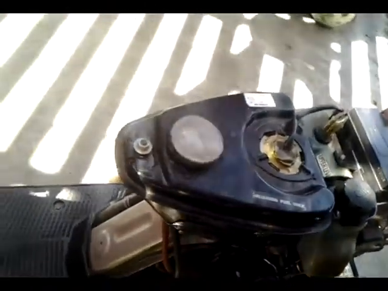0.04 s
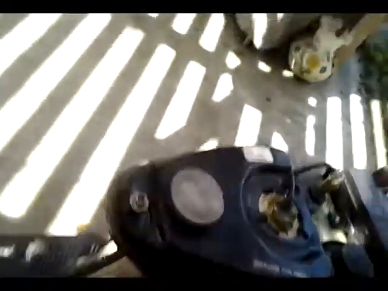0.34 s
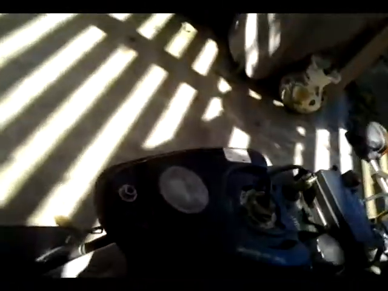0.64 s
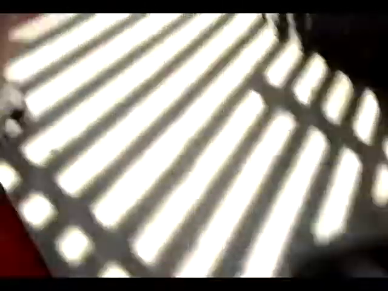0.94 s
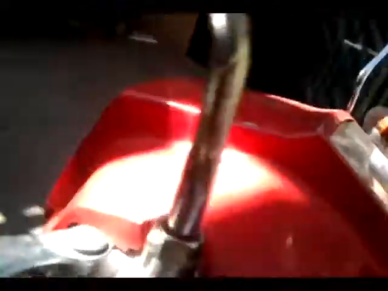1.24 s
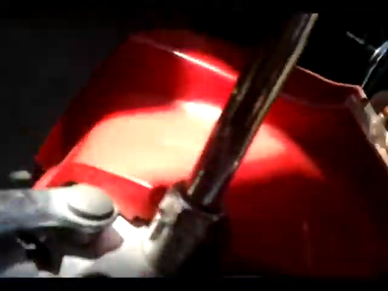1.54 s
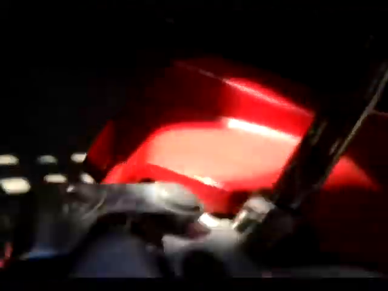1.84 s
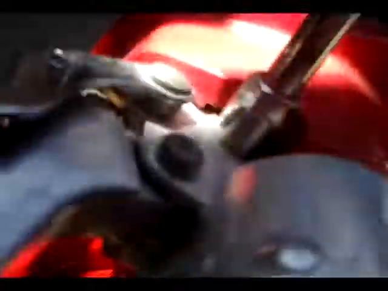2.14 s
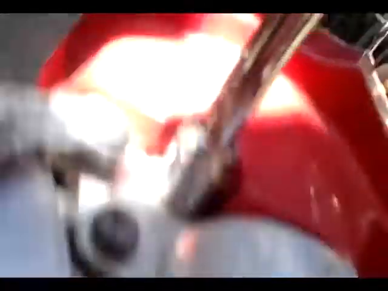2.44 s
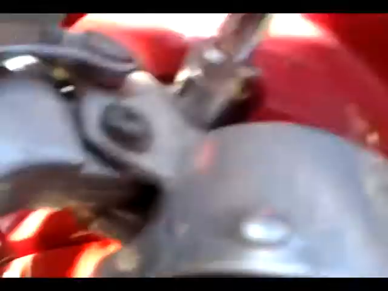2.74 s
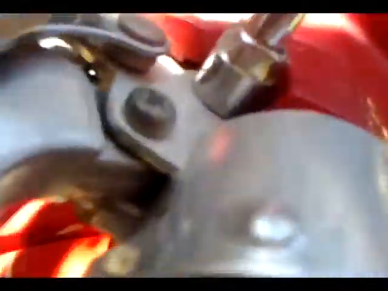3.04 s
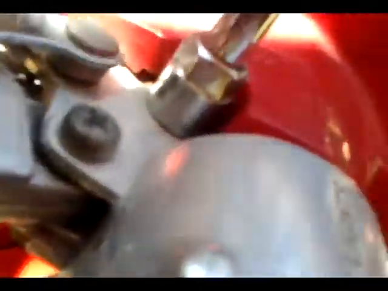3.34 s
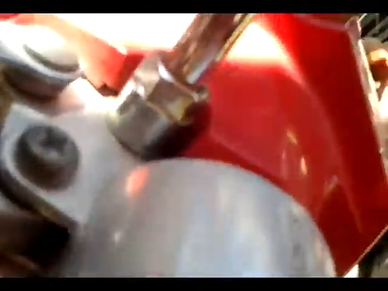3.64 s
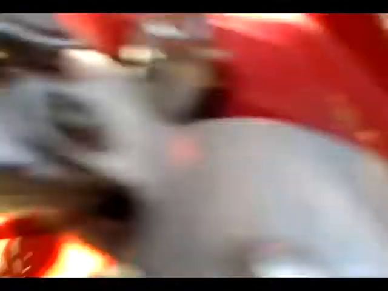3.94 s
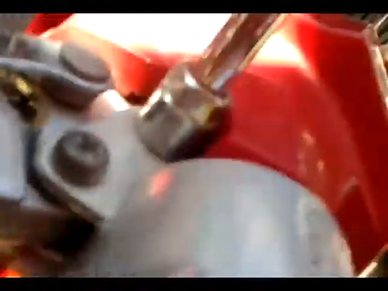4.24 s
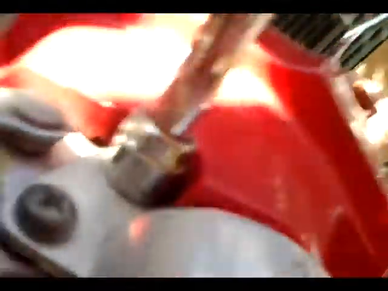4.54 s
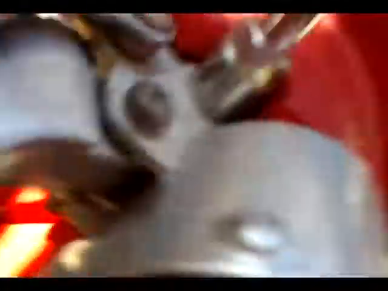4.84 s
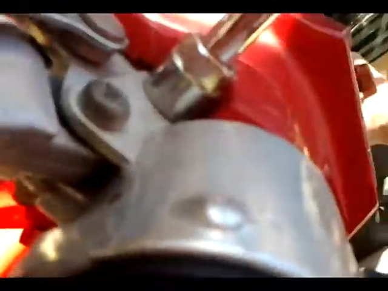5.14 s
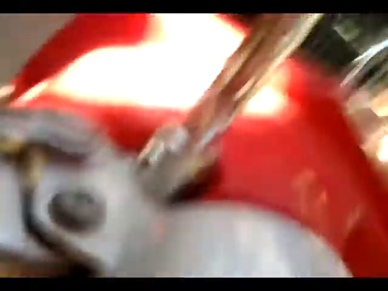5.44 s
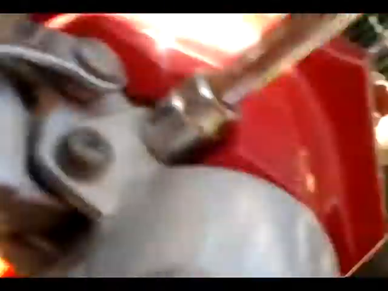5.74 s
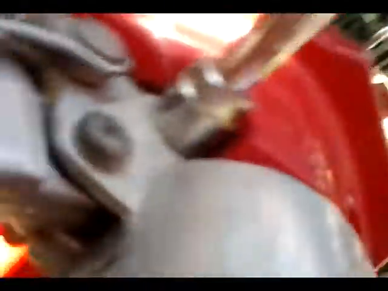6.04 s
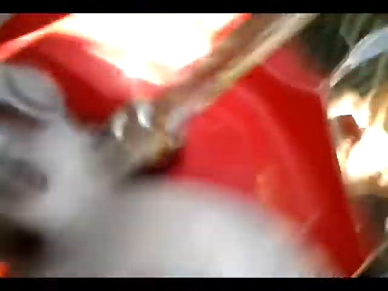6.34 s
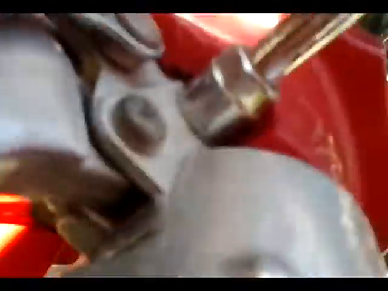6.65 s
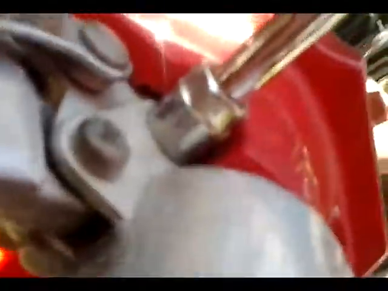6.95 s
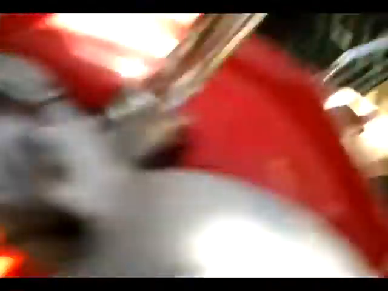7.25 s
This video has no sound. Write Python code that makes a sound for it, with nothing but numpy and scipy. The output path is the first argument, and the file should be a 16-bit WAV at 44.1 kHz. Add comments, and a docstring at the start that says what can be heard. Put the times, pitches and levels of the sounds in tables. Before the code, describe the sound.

A small two-stroke scooter is kicked over close to the microphone in a sheltered yard and never fires. After a soft scrape of the lever, two quick kicks come at about 0.4 and 0.7 seconds. Each kick is a sharp steel clack, a whirr of gears and ratchet, and a run of hollow piston chuffs that slows and fades amid knocks and rattling panels. After a short lull, more kicks follow at about 1.9, 2.7, 3.9, 4.7, 5.6 and 6.3 seconds, with a last one beginning at 7.2. The lever bites hardest at 2.7, and the cranking is strongest around 4 seconds. Between kicks, steel parts click and twang, most clearly near 3.6 seconds. The yard adds a brief echo. A soft outdoor hush lies underneath, with faint, distant bird chirps at the start and near 3.1 and 5.5 seconds.

```python
"""In a small sheltered yard, a two-stroke scooter is kicked over again and again and never fires.
With each kick, close to the microphone, the lever clacks into its gear, gears and ratchet whirr,
the piston chuffs and steel parts knock. Loose panels rattle as the engine coasts to rest.
The yard rings briefly, and a bird chirps far off over a soft outdoor hush."""
import sys
import numpy as np
from scipy import signal
from scipy.fft import rfft, irfft
from scipy.io import wavfile

SR = 44100
rng = np.random.default_rng(int(sys.argv[2]) if len(sys.argv) > 2 else 0)


def waveform_to_disk(signal):
    """Save audio, clipped to [-1, 1], as 16-bit WAV at the path in sys.argv[1]."""
    frames = np.transpose(np.atleast_2d(signal))
    scaled = np.clip(frames, -1, 1) * 32767
    samples = np.round(scaled).astype(np.int16)
    wavfile.write(sys.argv[1], SR, samples)


N = 322371
TIME = np.arange(N) / SR


def gain(db):
    """Turn decibels into a number to multiply by."""
    return 10 ** (np.asarray(db) / 20)


def unit(x):
    """Scale a signal to an average strength (rms) of 1."""
    return x / np.sqrt(np.mean(x ** 2))


def fade(t, t60):
    """Die away by 60 dB in t60 seconds, the ring time."""
    return np.exp(-np.log(1000) * t / max(t60, 1e-3))


def add(out, start_s, sound):
    """Mix a sound in at its start time."""
    i = max(int(start_s * SR), 0)
    out[i:i + len(sound)] += sound[:max(N - i, 0)]


def tap_response(tone, size=2048):
    """How a part with this table of frequencies and levels answers one sharp tap."""
    hz, db = np.transpose(tone)
    log_hz = np.log(np.fft.rfftfreq(size, 1 / SR) + 1)
    log_gain = np.log(gain(np.interp(log_hz, np.log(hz), db)))
    # fold the second half onto the first, so that nothing sounds before the tap
    folded = irfft(log_gain)
    folded[1:size // 2] *= 2
    folded[size // 2 + 1:] = 0
    return irfft(np.exp(rfft(folded)))


def colour(x, tone):
    """Give a signal the tone in a table, at strength 1."""
    return unit(signal.fftconvolve(x, tap_response(tone))[:len(x)])


def burst(response, shape):
    """A rough push of noise rings a part; the sound has the same energy as the push's shape."""
    push = rng.standard_normal(len(shape)) * shape
    sound = signal.fftconvolve(push, response)[:len(shape)]
    return sound * np.linalg.norm(shape) / np.linalg.norm(sound)


def notes(t, hz, spread, count, attack_s=0.00026):
    """A struck part sounds several notes at once, scattered around one pitch."""
    detune, weights = rng.standard_normal((count, 2)).T
    waves = np.sin(2 * np.pi * np.outer(t, hz * np.exp(spread * detune)))
    return waves @ unit(weights) * np.sqrt(2 / count) * (1 - np.exp(-t / attack_s))


# the tone of the open air: (frequency [Hz], relative level [dB])
HUSH_TONE = [(30, -25.5), (100, -3.5), (280, 4), (420, 1.5), (800, 0), (1500, -7.5), (2500, -9),
             (4500, -8.5), (6500, -12.5), (8000, -24), (10000, -35.5)]
def hush(db=-52):
    """A soft, steady outdoor noise."""
    return gain(db) * colour(rng.standard_normal(N), HUSH_TONE)


# a far-off bird: (time [s], length [s], first pitch [Hz], last pitch [Hz], level [dB])
BIRD_CHIRPS = [(.135, 0.012, 5900, 6200, -58), (0.17, .05, 5500, 5950, -60), (0.24, .022, 5950, 5600, -65),
               (.275, .028, 5950, 5600, -64), (3.112, 0.06, 5270, 4960, -53),
               (3.155, 0.047, 5900, 5750, -61), (5.446, 0.046, 5160, 5860, -50.5),
               (5.497, 0.054, 5320, 4800, -49), (6.143, 0.035, 6050, 5880, -63)]
def bird():
    """Each thin chirp swells and fades while its pitch slides."""
    out = np.zeros(N)
    for start, length, first_hz, last_hz, db in BIRD_CHIRPS:
        progress = np.linspace(0, 1, int(length * SR))
        hz = first_hz + (last_hz - first_hz) * progress
        whistle = np.sin(2 * np.pi * np.cumsum(hz) / SR)
        add(out, start, gain(db) * np.sin(np.pi * progress) * whistle)
    return out


def yard(x, low_t60=0.66, high_t60=0.19, split_hz=1800, low_db=-7, high_db=-12.5, build_s=0.0065):
    """Floor, walls and slatted roof send back a short wash of echoes; the low ones last longer."""
    t = np.arange(SR) / SR
    echoes = rng.standard_normal(len(t)) * (1 - np.exp(-t / build_s)) ** 2
    response = 0
    for kind, t60, db in (("low", low_t60, low_db), ("high", high_t60, high_db)):
        tail = echoes * fade(t, t60)
        band = signal.butter(1, split_hz, kind, fs=SR, output="sos")
        response = response + gain(db) * signal.sosfilt(band, tail / np.linalg.norm(tail))
    return signal.fftconvolve(x, response)[:N]


# the bright tone of the steel parts, with its top treble shaped by the recorder:
# (frequency [Hz], relative level [dB])
STEEL_TONE = [(1200, -59), (2200, -3), (2700, -1), (3400, -0.5), (3750, -3), (4450, 1), (5250, -1.5),
              (5950, -8), (6700, -10.5), (7400, -22), (8100, -33.5), (9500, -23.5), (11000, -46)]
def scrape(start_s=0.18, end_s=0.48, db=-54, edge_s=0.02):
    """The lever slides softly through its slack as the first kick begins."""
    sliding = np.clip(np.minimum(TIME - start_s, end_s - TIME) / edge_s, 0, 1)
    return gain(db) * sliding * colour(rng.standard_normal(N), STEEL_TONE)


# the notes of frame and lever: (pitch [Hz], relative level [dB], ring time [s])
FRAME_NOTES = [(276, -18, 0.95), (328, -8, 0.34), (522, -15, 0.2), (855, -8.5, .15), (1080, -20, 0.21),
               (1380, -14.5, 0.12), (2000, -27, 0.22), (2374, -3, 0.065), (3240, -9, 0.18),
               (4230, -33, 0.18), (4570, -12, 0.093), (4800, -20, 0.24), (6640, -9, .25)]
def frame(shaking):
    """Once shaken, the frame and lever go on ringing at their own notes."""
    out = np.zeros(N)
    for hz, db, t60 in FRAME_NOTES:
        decay = fade(1 / SR, t60)
        step = decay * np.exp(2j * np.pi * hz / SR)  # each sample, the ring turns and shrinks a little
        out += 2 * (1 - decay) * gain(db) * signal.lfilter([1], [1, -step], shaking).imag
    return out


# steel springing free: (time [s], pitch [Hz], pitch spread [fraction], level [dB], ring time [s])
STEEL_TWANGS = [(0.419, 4250, 0.031, -14, 0.03), (3.584, 4210, 0.057, -10.5, 0.032),
                (3.792, 1360, 0.02, -28, 0.2), (4.223, 6610, 0.0093, -41, 0.3),
                (4.3, 347.8, 0.003, -43, 1.24), (6.645, 3658, .035, -28, 0.25),
                (6.645, 4645, 0.039, -32, 0.16)]
def twangs():
    """Lever, spring and stand keep singing once a blow has let them go."""
    out, t = np.zeros(N), np.arange(SR * 3 // 4) / SR
    for start, hz, spread, db, t60 in STEEL_TWANGS:
        add(out, start, gain(db) * fade(t, t60) * notes(t, hz, spread, count=12))
    return out


def rattle(shake_db, count, db, scatter_db, low_t60, low_hz, high_hz, limit_db):
    """Loose parts clink at random, as hard as the engine shakes them and their slack allows."""
    out, t = np.zeros(N), np.arange(SR // 12) / SR
    for when, part, size in rng.random((count, 3)):
        i = int(when * N)
        hz = low_hz * (high_hz / low_hz) ** part
        clink_db = min(shake_db[i], limit_db) + db + scatter_db * (2 * size - 1)
        t60 = low_t60 * np.sqrt(low_hz / hz)  # small parts ring higher and die sooner
        add(out, i / SR, gain(clink_db) * fade(t, t60) * notes(t, hz, 0.049, count=3))
    return out


def turn_time(hardest_s, turn, turn_s=.056, slowing=.02):
    """When the slowing piston squeezes its air, counting turns from the hardest squeeze."""
    return hardest_s + turn * turn_s * (1 + slowing * turn)


# strokes of the foot: (time [s], push length [s], gears at full speed [dB], their swell [dB],
# extra treble [dB], pumped air [dB], coasting gears [dB], coasting air [dB], run-down [dB/s],
# time of hardest squeeze [s], its puff [dB])
FOOT_KICKS = [(0.423, .165, -22.5, 11, -2, -32, -34, -27, 43.5, .594, -15),
              (.74, .13, -37, 2, 9, -35, -36, -31, 29, 0.79, -19.5),
              (1.94, 0.22, -28, 3, -5, -29, -33.5, -37, 44, 2.14, -27),
              (2.677, .21, -30, -1, 4, -35, -33.5, -35, 35.5, 2.91, -34),
              (3.887, .235, -19.5, 9, 4, -29, -33, -31.5, 37, 4.07, -17),
              (4.721, 0.23, -22.5, 8.5, -1, -29, -34, -32.5, 30, 4.88, -18.5),
              (5.62, .23, -26, 1.5, 3, -29.5, -31.5, -35, 35, 5.835, -25),
              (6.338, 0.25, -26, 2, -1, -29.5, -33, -32.5, 45.5, 6.554, -21),
              (7.201, 0.19, -28.5, 3.5, 5, -33.5, -27, -36, 40, 8.2, -24)]
def kicks(attack_s=.012, release_db_per_s=125, coast_s=.38, stop_db_per_s=60,
          air_swell_db=5, throb_db=2.5, coast_treble_db=-2):
    """Each push swells, then the engine coasts; gives the strength of case, steel and air over time."""
    power, turns = np.zeros((3, N)), np.arange(-8, 16)
    for (start, push, gear_db, swell_db, treble_db, air_db,
         coast_db, coast_air_db, run_down, hardest_s, _) in FOOT_KICKS:
        push_left = np.clip(1 - (TIME - start) / push, 0, 1)
        after_s = np.maximum(TIME - start - push, 0)
        drive = np.clip((TIME - start) / attack_s, 0, 1) * gain(-release_db_per_s * after_s)
        stopping_db = stop_db_per_s * np.maximum(after_s - coast_s, 0)
        coast = (1 - push_left) * gain(-run_down * after_s - stopping_db)
        # the gears strain against each squeeze of the piston
        turn = np.interp(TIME, turn_time(hardest_s, turns), turns)
        throb = gain(throb_db * np.cos(2 * np.pi * turn))
        pushed_gears = drive * gain(gear_db - swell_db * push_left)
        pushed_air = drive * gain(air_db - air_swell_db * push_left)
        pushed = (pushed_gears, gain(treble_db), pushed_air)
        coasting = (coast * gain(coast_db), gain(coast_treble_db), coast * gain(coast_air_db))
        for gears, treble, air in (pushed, coasting):
            case = throb * gears / np.hypot(1, treble)
            power += np.array([case, treble * case, air]) ** 2
    return np.sqrt(power)


# the deep tone of the hollow body: (frequency [Hz], relative level [dB])
BODY_TONE = [(30, -48), (80, -20.5), (130, -15.5), (160, -9), (195, -11), (275, 0), (315, 3), (400, -6.5),
             (530, 0.5), (600, -5.5), (680, -8), (1100, -53)]
def chuffs(pumped_air, swell_s=0.0065, breath_db=-4, boom_hz=285, boom_db=-5, turn_db=2, scatter_db=0.6):
    """Once a turn, unburnt fuel and air puff out and boom in the hollow body."""
    out, t = np.zeros(N), np.arange(SR // 10) / SR
    body = tap_response(BODY_TONE)
    puff = t / swell_s * np.exp(1 - t / swell_s)
    for *_, hardest_s, hardest_db in FOOT_KICKS:
        for turn in range(-1, 10):
            start = turn_time(hardest_s, turn)
            if turn == 0:
                size = gain(hardest_db)
            else:
                air = np.interp(start, TIME, pumped_air)
                size = air * gain(turn_db + scatter_db * rng.standard_normal())
            boom = puff * notes(t, boom_hz, 0.12, count=5)
            add(out, start, size * (gain(breath_db) * burst(body, puff) + gain(boom_db) * boom))
    return out


def ratchet(rate_hz, jitter=.22, scatter_db=4, tick_t60=0.031):
    """Ratchet teeth drop unevenly; gives the strength of their ticking over time."""
    spacing, size = rng.standard_normal((4000, 2)).T
    teeth_passed = np.cumsum(rate_hz) / SR
    drops = np.searchsorted(teeth_passed, np.cumsum(np.exp(jitter * spacing)))
    ticks = np.bincount(drops, gain(scatter_db * size), N + 1)[:N]
    return unit(signal.lfilter([1], [1, -fade(1 / SR, tick_t60)], ticks))


# the tone of the cast metal engine case: (frequency [Hz], relative level [dB])
CASE_TONE = [(350, -42.5), (680, -11), (850, 2.5), (1000, 2), (1150, 2.5), (1260, -4), (1430, 3.5),
             (1800, -3.5), (2150, -1.5), (2500, -13.5), (3300, -10), (8000, -77)]
def cranking(strengths, shake_db, slow_hz=90, fast_hz=240, rub=.75, case_db=-4.5, steel_db=-4.6,
             air_db=-5):
    """Gears and ratchet chatter faster the harder the engine spins, while the piston pumps air."""
    chatter = rub + ratchet(np.interp(shake_db, [-45, -20], [slow_hz, fast_hz]))
    parts = zip(strengths, (case_db, steel_db, air_db), (CASE_TONE, STEEL_TONE, BODY_TONE))
    return sum(gain(db) * strength * colour(chatter * rng.standard_normal(N), tone)
               for strength, db, tone in parts)


# the lever catching its gear: (time of bite [s], touch earlier by [s], settling later by [s],
# bite level [dB], settling level [dB], click above ring [dB])
LEVER_CATCHES = [(.417, 0.012, 0.015, -18.5, -18.5, 2.5), (2.67, 0.019, .005, -5.5, -3, 1.5),
                 (3.887, 0.0087, .021, -23, -15, 8.5), (4.709, .01, 0.012, -15.5, -18, 1),
                 (5.61, .012, .005, -12, -10.5, 6.5), (6.334, .046, .019, -12.5, -16.5, -5),
                 (7.208, .005, .022, -14.5, -17, -3)]
def lever_blows(touch_db=-9, touch_click_db=-5, bite_hz=4300, bite_treble_db=6,
                settle_hz=1330, settle_treble_db=-4):
    """The lever catches in three blows: a light touch, a bright bite and a duller settling."""
    blows = []
    for start, lead, lag, bite_db, settle_db, click_db in LEVER_CATCHES:
        blows += [(start - lead, bite_db + touch_db, touch_click_db, bite_treble_db, bite_hz),
                  (start, bite_db, click_db, bite_treble_db, bite_hz),
                  (start + lag, settle_db, click_db, settle_treble_db, settle_hz)]
    return blows


# single knocks of lever, ratchet catch and stand:
# (time [s], ring level [dB], click above ring [dB], extra treble [dB], pitch [Hz])
SINGLE_KNOCKS = [(.369, -42, -4, 1, 1170), (.457, -17.5, 2, 7, 1067), (.479, -20, -16, 7, 1060),
                 (.506, -22, -4, 0, 5220), (.518, -16, -16, 4, 5000), (.527, -15, 5.5, -1, 5040),
                 (.553, -23, 11, 14, 4670), (.572, -16.5, 9.5, 7, 3520), (.632, -14, -9, 0, 1130),
                 (.666, -22, -8, 0, 886), (.739, -12, -3, 2.5, 4400), (.786, -19.5, -20, 0, 1010),
                 (.808, -33, 3, -3, 1020), (.845, -18.5, 4, -19, 1030), (.851, -17.5, -18, -2, 1010),
                 (1.0, -36.5, 9, -3, 1150), (1.063, -31, 1, -1, 3810), (1.101, -28.5, -13, 3, 5250),
                 (1.146, -29.5, 8, -4.5, 4230), (1.228, -30, -10, -5.5, 1175), (1.642, -43.5, -8, 6, 5660),
                 (1.727, -36.5, -12, -2, 3580), (1.84, -39, 2, 15, 4500), (1.918, -23.5, 4, -3, 1460),
                 (1.996, -18.5, -18, -1.5, 4350), (2.047, -25.5, 5, 9, 2240), (2.097, -11.5, -1, 7, 4330),
                 (2.135, -21.5, 3, 5, 1086), (2.284, -29, -8, -2.5, 1450), (2.545, -40, -6, -23, 1160),
                 (2.63, -36, -25, 6, 4320), (2.788, -17.5, -9, 1, 4000), (2.868, -15, -20, -5.5, 940),
                 (3.075, -23.5, -16, -9.5, 1180), (3.255, -34, -1, -4, 1216),
                 (3.279, -22.5, 2.5, 6.5, 4070), (3.339, -29, -10, 1.5, 3530),
                 (3.476, -38.5, -8, -14, 2170), (3.56, -23, -4, 7, 3330), (3.583, -22.5, 8, 7, 4130),
                 (3.789, -19.5, -16, 4, 4500), (3.989, -17.5, -19, 0, 4100), (4.003, -13.5, -14, 2, 987),
                 (4.088, -12.5, -14, 8, 4600), (4.115, -8.5, -10, -3, 3062), (4.159, -34.5, 33.5, 6, 3650),
                 (4.223, -19, -10, 1.5, 4620), (4.301, -23.5, -16, -6, 965), (4.337, -21, -12, -0.5, 1359),
                 (4.458, -27, -7, -12, 1193), (4.637, -38, -14, 1, 1240), (4.661, -35.5, -2, -16, 2180),
                 (4.831, -14.5, -20, -2.5, 1000), (4.987, -20.5, 7, 4, 2230), (5.217, -30, -16, 0, 2190),
                 (5.361, -36.5, -19, -24, 1315), (5.705, -15.5, -11, 0, 1012),
                 (5.812, -20.5, -6.5, 0, 5070), (5.835, -16.5, -13, -3.5, 4900),
                 (6.072, -29.5, -9, -8, 1630), (6.114, -32, -1, -4, 1220), (6.266, -32, -12, -8, 1255),
                 (6.467, -16, -10, 6, 4450), (6.481, -13.5, -9, -0.5, 4320), (6.554, -10.5, -15, -2, 1536),
                 (6.645, -22.5, -15, -1, 4510), (6.849, -35.5, 10, -5, 4402), (7.112, -39, -13.5, -9, 1090),
                 (7.293, -20.5, -15, -4, 5400)]
def knocks(contact_s=0.003, panel_t60=0.048, case_t60=0.14, case_db=-1.5, clack_db=-2.5, bass_db=-6,
           ping_db=-5, sing_db=-7.5, body_rise_s=0.0016, body_time_scale=0.91):
    """Steel meets steel: a hard click, then the body, case and lever ring out."""
    out, t = np.zeros(N), np.arange(SR // 7) / SR
    body, case, steel = (tap_response(tone) for tone in (BODY_TONE, CASE_TONE, STEEL_TONE))
    contact = np.exp(-(t / contact_s) ** 2)
    # panels go quiet quickly while cast metal rings on
    decay = np.hypot(fade(t, panel_t60), gain(case_db) * fade(t, case_t60))
    for start, ring_db, click_db, treble_db, hz in lever_blows() + list(SINGLE_KNOCKS):
        click = gain(ring_db + click_db) * contact
        ring = gain(ring_db) * decay
        blow = np.hypot(click, ring)
        # the heavy body takes a moment to answer
        thud = np.interp(t / body_time_scale, t, blow) * (1 - np.exp(-t / body_rise_s))
        bass, treble = gain(bass_db), gain(treble_db)
        clack = bass * burst(body, thud) + burst(case, blow) + treble * burst(steel, blow)
        clack /= np.sqrt(1 + bass ** 2 + treble ** 2)
        # the struck part pings and sings around its own pitch
        ping = gain(ping_db) * click * notes(t, hz, spread=0.1, count=6)
        sing = gain(sing_db) * ring * notes(t, hz, spread=0.1, count=6)
        add(out, start, gain(clack_db) * clack + ping + sing)
    return out


def scene(rest_db=-58):
    """The scooter in its yard, with the bird and the hush behind it."""
    case, steel, air = kicks()
    shake_db = 20 * np.log10(np.hypot(case, steel) + gain(rest_db))
    brackets = rattle(shake_db, count=800, db=-3.5, scatter_db=3.5, low_t60=0.067,
                      low_hz=849.7, high_hz=5210, limit_db=-19)
    panels = rattle(shake_db, count=150, db=2.5, scatter_db=0.5, low_t60=0.087,
                    low_hz=983, high_hz=2320, limit_db=-37.5)
    scooter = knocks() + cranking((case, steel, air), shake_db)
    scooter += brackets + panels + chuffs(air) + scrape()
    scooter += frame(scooter) + twangs()
    return (scooter + yard(scooter) + bird() + hush())[None]


def record(dry, low_hz=45, high_hz=11000, thump_hz=100, thump_db=-7, top_hz=15600):
    """The microphone loses deep bass and high treble, and overloads with a thump on the hardest blows."""
    thin = signal.sosfilt(signal.butter(2, low_hz, "high", fs=SR, output="sos"), dry)
    narrow = signal.sosfilt(signal.ellip(8, .2, 70, high_hz, fs=SR, output="sos"), thin)
    overload = np.maximum(np.abs(narrow) - 1, 0)
    thump = signal.sosfilt(signal.butter(2, thump_hz, fs=SR, output="sos"), overload)
    clipped = np.clip(narrow - gain(thump_db) * thump, -1, 1)
    return signal.sosfilt(signal.ellip(8, .2, 80, top_hz, fs=SR, output="sos"), clipped)


dry = scene()
out = record(dry)
waveform_to_disk(out)
```